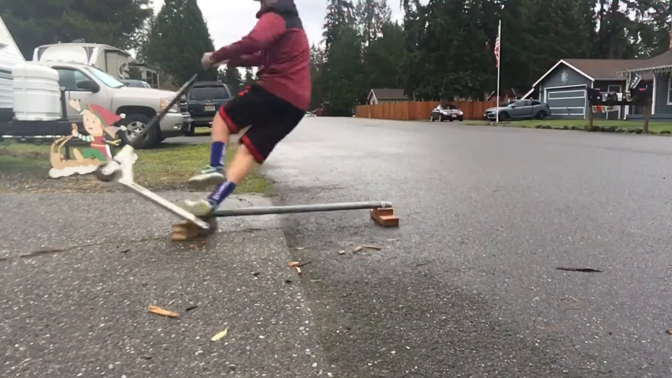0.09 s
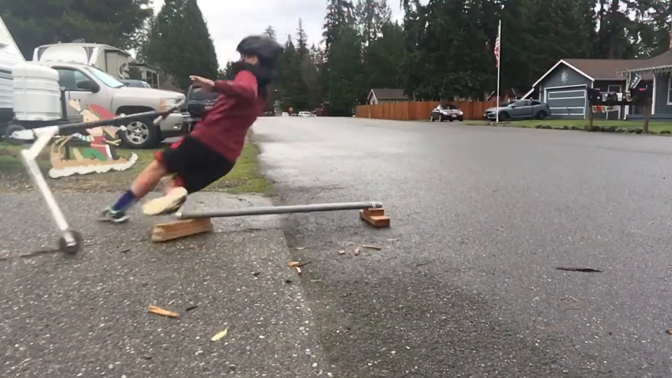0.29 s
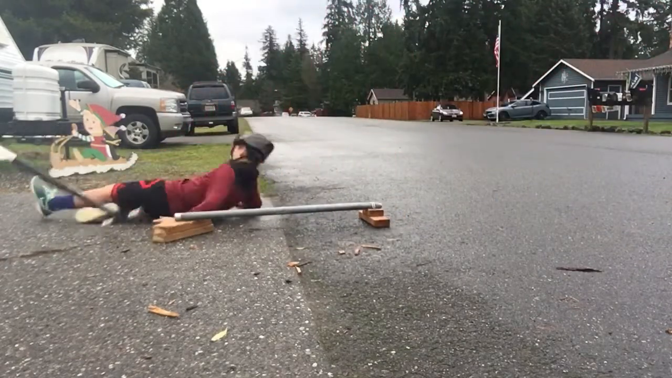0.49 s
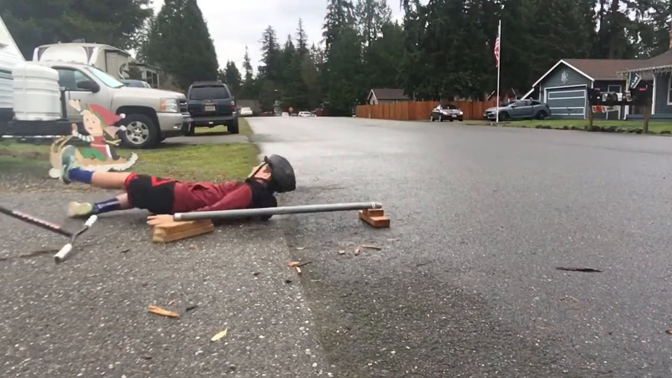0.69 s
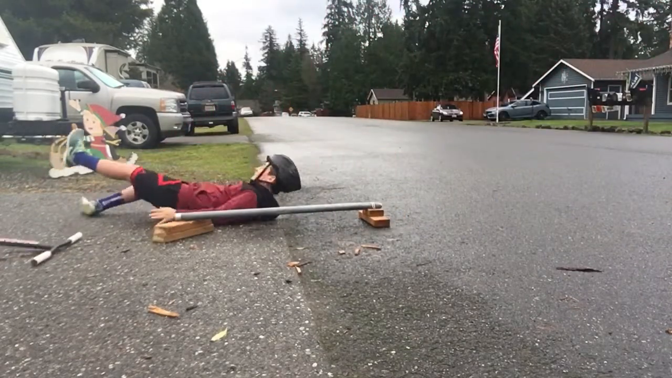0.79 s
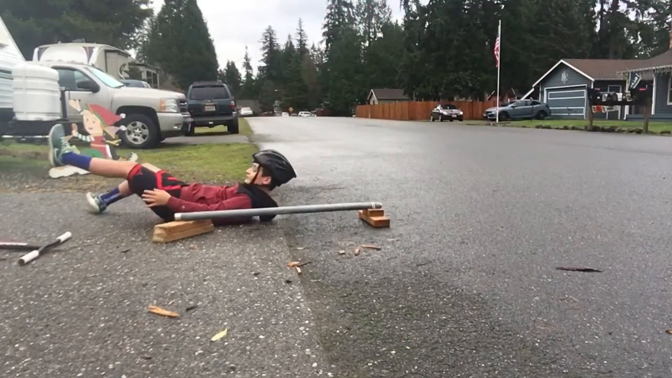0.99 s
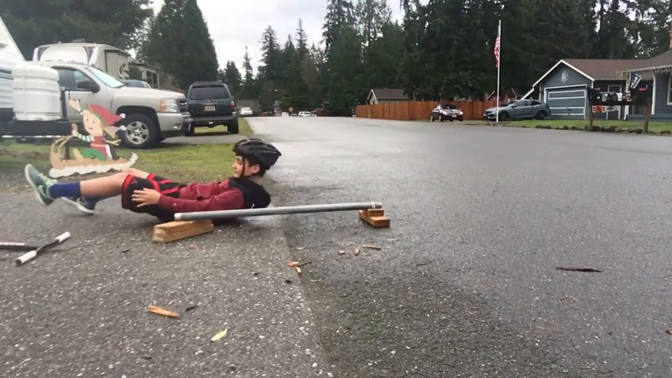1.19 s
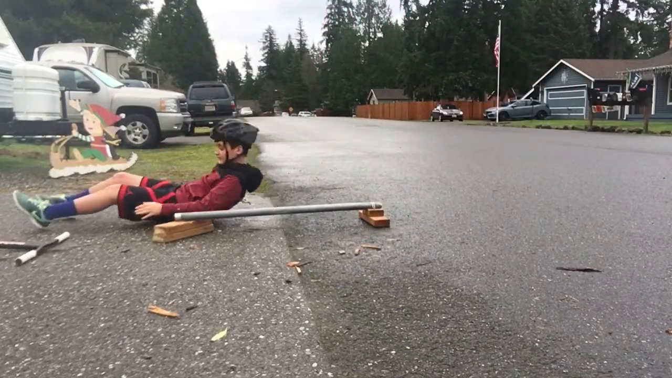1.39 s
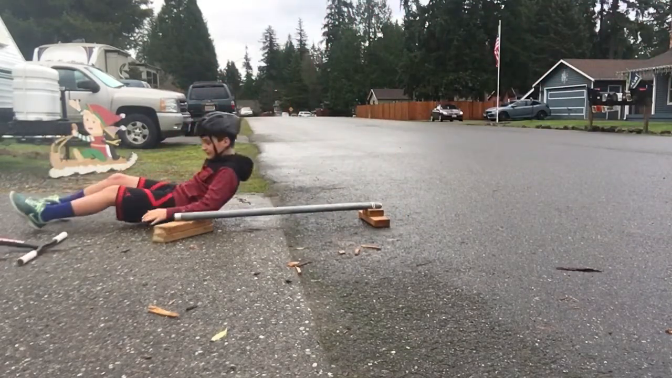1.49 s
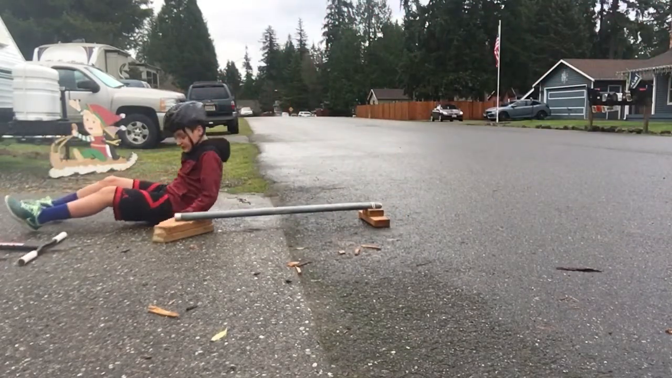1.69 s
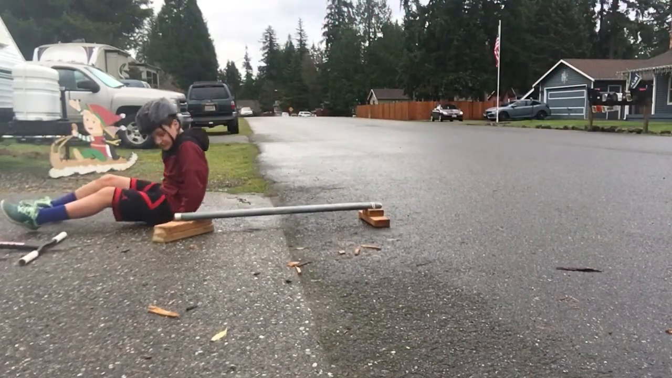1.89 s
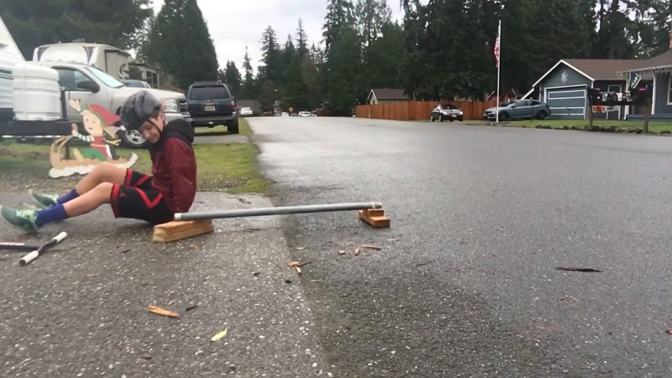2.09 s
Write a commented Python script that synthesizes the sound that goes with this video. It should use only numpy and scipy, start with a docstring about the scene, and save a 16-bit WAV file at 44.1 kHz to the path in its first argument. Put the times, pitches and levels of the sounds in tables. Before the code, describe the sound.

A metal kick scooter crashes and clatters over asphalt after its rider thuds down beside a rail

```python
"""A metal kick scooter tumbles over asphalt: blows of filtered noise crack, rattle and ring modal steel,
its deck knocks hollow and its fittings ping; between bounces it drags, grit ringing the frame.
Its rider slips off a low steel rail: soft noise thumps, snapping grit and a grainy slide, with ringing
rail and handlebar tube. Houses and trees echo all this as decaying noise, over faint outdoor air."""
import sys
import numpy as np
from scipy import signal
from scipy.fft import rfft, irfft, next_fast_len
from scipy.io import wavfile

SR = 44100
rng = np.random.default_rng(int(sys.argv[2]) if len(sys.argv) > 2 else 0)


def dump(signal):
    """Clip the signal to [-1, 1] and save it as 16-bit WAV at the path in sys.argv[1]."""
    limited = np.clip(np.atleast_2d(signal).T, -1, 1)
    pcm = np.round(limited * 32767).astype(np.int16)
    wavfile.write(sys.argv[1], SR, pcm)


N = 92610
AGE = np.arange(32768) / SR  # seconds since an onset

# Band centres [Hz] of thud, middle, treble and top.
TONE_HZ = [200, 1100, 4500, 12000]
# Scooter frame modes. Each row: frequency in Hz, level in dB, T60 in seconds.
FRAME_MODES = [(275, -3.5, 0.066), (472, -5.5, 0.13), (924.5, -1, 0.093), (1090, -13, 0.14),
               (1225, -4.5, 0.16), (1713, -8.5, 0.13), (1564, -12, 0.27), (1945, -8, 0.26),
               (2616, -16.5, 0.2), (2800, -13, 0.14), (4010, -13.5, 0.1), (5520, -21, 0.083)]


def undb(db):
    """Decibels to gain."""
    return 10 ** (np.asarray(db) / 20)


def add(out, start_s, x):
    """Mix x into out from start_s on."""
    i = max(int(start_s * SR), 0)
    out[i:i + len(x)] += x[:N - i]


def colour(x, points, unit=False):
    """Minimum-phase filter through (Hz, dB) points; unit keeps the power of white noise."""
    size = next_fast_len(len(x) + 4096, True) // 2 * 2
    point_hz, point_db = np.array(points, float).T
    bin_hz = np.arange(size // 2 + 1) * SR / size
    gain = undb(np.interp(np.log(bin_hz + 1), np.log(point_hz), point_db))
    if unit:
        gain = gain / np.sqrt(np.mean(gain ** 2))
    # Folding the cepstrum makes the filter causal.
    cepstrum = irfft(np.log(gain))
    cepstrum[1:size // 2] *= 2
    cepstrum[size // 2 + 1:] = 0
    response = np.exp(rfft(cepstrum))
    return irfft(rfft(x, size) * response)[:len(x)]


def walk(rate_hz, size):
    """Random wander: straight lines between normal draws, rate_hz draws a second."""
    position = np.arange(size) * rate_hz / SR
    return np.interp(position, np.arange(size), rng.standard_normal(size))


def grains(spread, size):
    """Tiny contacts as noise of uneven strength, scaled to unit deviation."""
    x = rng.standard_normal(size) * np.exp(spread * walk(1500, size))
    return x / x.std()


def burst(decay_s, points, spread=0.):
    """Coloured noise of a contact, dying exponentially; its energy is set by its length."""
    x = colour(grains(spread, len(AGE)) * np.exp(-AGE / decay_s), points)
    return x * np.sqrt(SR * decay_s / 2) / np.linalg.norm(x)


def ring(modes):
    """Struck modes die away; each beats with a weaker twin, detuned at random at each call."""
    twin_split_hz, twin_db = 28.4, -1
    out = 0
    for hz, db, t60_s in modes:
        drift, split, phase = rng.standard_normal(3)
        t = AGE[:int(min(t60_s * 1.5, .74) * SR)].astype(np.float32)
        # float() keeps the arithmetic in single precision
        omega = float(2 * np.pi * hz * (1 + .002 * drift))
        twin_omega = omega + float(2 * np.pi * twin_split_hz * split)
        twin = undb(twin_db) * np.sin(twin_omega * t + float(np.pi * phase))
        fade = np.exp(-t * float(np.log(1000) / t60_s))
        mode = rng.choice([-1, 1]) * undb(db) * (np.sin(omega * t) + twin) * fade
        out = out + np.pad(mode, (0, len(AGE) - len(t)))
    return out


def air():
    """Faint outdoor air: coloured noise whose level wanders slowly."""
    # Each row: frequency in Hz, level in dB.
    air_colour = [(15, -24), (25, -3), (64, 5), (207, -1.5), (318, 0.5), (515, -5), (621, 3), (1910, -16.5),
                  (2560, -28), (3440, -24), (4870, -30.5), (12400, -42), (15000, -55.5)]
    level_db, wander_db = -50, 0.82
    noise = colour(rng.standard_normal(N), air_colour, True)
    return undb(level_db + wander_db * walk(8, N)) * noise


def rider_slide():
    """Shoes and clothes scrape over the asphalt: grainy coloured noise under varying pressure."""
    # Each row: time in seconds, level in dB before flutter.
    slide = [(0, -39.5), (0.139, -59), (.19, -39), (.235, -33.5), (.255, -36), (.30, -38.5), (.35, -39),
             (.40, -36.5), (.52, -46), (1.0, -86.5)]
    # Each row: frequency in Hz, level in dB.
    scrape = [(60, -8.5), (250, 7.5), (600, -4), (1300, 2.5), (2500, -3.5), (4500, -8), (7000, -10),
              (9000, -23), (15000, -22)]
    grain_spread, flutter_db = .6, 1.8
    pressure_db = np.interp(np.arange(N) / SR, *np.array(slide).T) + flutter_db * walk(70, N)
    return undb(pressure_db) * colour(grains(grain_spread, N), scrape, True)


def rider_thumps():
    """Shoes, hands and body land: short low noise bursts, their slap set by a treble tilt."""
    # Each row: start in seconds, level in dB, decay in seconds, centre in Hz, slap (tilt by 900 Hz) in dB.
    thumps = [(0.001, -28.5, .016, 229, -6), (0.074, -40.5, 0.017, 152, -17.5),
              (0.169, -33.5, 0.013, 184, -39.5), (0.2127, -20, 0.0044, 198, -6),
              (0.2739, -23.5, 0.0087, 247, -4), (0.312, -26, 0.002, 298, 11.5),
              (0.337, -25.5, 0.007, 180, -9), (0.381, -25, 0.0034, 237, -2), (0.447, -29, 0.025, 120, 7.5)]
    # Each row: ratio to the centre, level in dB.
    thump_colour = [(.2, -36.5), (.5, -4), (1.0, 4.5), (1.6, -7.5), (3, -6.5), (7, -13), (15, -21),
                    (60, -49.5)]
    out = np.zeros(N)
    for start_s, db, decay_s, centre_hz, slap_db in thumps:
        push = burst(decay_s, [(centre_hz * ratio, gain_db) for ratio, gain_db in thump_colour])
        add(out, start_s, undb(db) * colour(push, [(300, 1.1), (900, 5.5 + slap_db)]))
    return out


def handlebar():
    """The handlebar tube clinks lightly: ringing modes with a short noisy rasp."""
    # Each row: start in seconds, middle, treble and top gain in dB, rasp in dB, rasp decay in seconds.
    clinks = [(0.001, -42, -42.5, -43, 4, .028), (0.1515, -35, -41, -51, 10, .008),
              (0.187, -44, -45, -42, 3, .022)]
    # Each row: frequency in Hz, level in dB, T60 in seconds.
    tube_modes = [(1322, -2, .22), (1620, -2, .12), (2040, -2, .13), (2290, -4, .18), (2570, -3.5, .24),
                  (2966, -5, .26), (5905, -8, .17), (7230, -3.5, .21), (7450, -9, .16), (9017, -11, .14),
                  (11090, -13, .14), (13600, -8, .16), (14220, -9, .14)]
    # Each row: frequency in Hz, level in dB.
    rasp_colour = [(300, -10.5), (1900, 0), (4000, -7.5), (7000, -6), (9500, -14), (14000, -14)]
    out = np.zeros(N)
    for start_s, middle_db, treble_db, top_db, rasp_db, decay_s in clinks:
        tone = list(zip(TONE_HZ[1:], (middle_db, treble_db, top_db)))
        clink = ring(tube_modes) + undb(rasp_db) * burst(decay_s, rasp_colour)
        add(out, start_s, colour(clink, tone))
    return out


def street(x):
    """Scattered echo: bands of noise swell, peak again with the house fronts, and fade at their own T60."""
    # Each row: band centre in Hz, level in dB, T60 in seconds.
    echo_bands = [(120, -72, .8), (280, -19, 1), (620, -12.5, 0.94), (1240, -17.5, 0.34), (1900, -17, 0.64),
                  (3900, -14.5, 0.41), (7500, -35, 0.53), (12860, -22, .4)]
    rise_s, house_s, house_spread_s, house_gain = 0.011, 0.085, 0.026, 0.37
    bin_hz = np.arange(len(AGE) // 2 + 1) * SR / len(AGE)
    log_centres = np.log([row[0] for row in echo_bands])
    noise = rfft(rng.standard_normal(len(AGE)))
    houses = house_gain * np.exp(-((AGE - house_s) / house_spread_s) ** 2)
    swell = 1 - np.exp(-AGE / rise_s) + houses
    tail = 0
    for share, (_, db, t60_s) in zip(np.eye(len(echo_bands)), echo_bands):
        fade = swell * np.exp(-np.log(1000) * AGE / t60_s)
        band = irfft(noise * np.interp(np.log(bin_hz + 1), log_centres, share))
        tail = tail + undb(db) * band * fade / np.linalg.norm(fade)
    return signal.fftconvolve(x, tail)[:N]


def deck():
    """Deck and wheels knock hollow: each swells and dies within a few cycles, leaving a faint ring."""
    # Each row: start in seconds, level in dB, centre in Hz.
    deck_knocks = [(0.089, -24, 554), (0.312, -5, 1253), (0.4255, -2.5, 582), (0.4375, -2, 845),
                   (0.4432, -7, 1780), (0.4504, -4, 1794), (0.458, -1, 1773), (0.7149, -4, 1190),
                   (0.7232, 6, 1390), (0.7255, 1, 1138), (0.7257, -1.5, 275.2), (0.827, -5.5, 1140),
                   (1.2911, 3, 1058), (1.3036, -9, 1120), (1.3169, 4.5, 1090), (1.3215, -6.5, 518),
                   (1.325, -11, 279), (1.5196, 8.5, 1071), (1.5251, -16, 289), (1.5402, 1, 1107),
                   (1.438, -20, 522), (1.640, -16.5, 602), (1.7912, -4, 1051), (1.7913, -15.5, 314.5),
                   (1.7924, -3.5, 1730), (1.854, -11.5, 1135)]
    # Each row: ratio to the centre, level in dB, T60 in cycles of the centre.
    deck_modes = [(0.884, -26, 102), (0.998, -0.5, 11.4), (1.172, -31, 100)]
    rise_cycles = 1.12
    out = np.zeros(N)
    for start_s, db, centre_hz in deck_knocks:
        cycles = centre_hz * AGE
        knock = 0
        for ratio, gain_db, t60_cycles in deck_modes:
            fade = np.exp(-np.log(1000) * cycles / t60_cycles)
            knock = knock + undb(gain_db) * np.sin(2 * np.pi * ratio * cycles) * fade
        rise = (1 - np.exp(-cycles / rise_cycles)) ** 2
        add(out, start_s, undb(db) * knock * rise)
    return out


def grit_snaps():
    """Grit snaps under rider and scooter: brief noise bursts around a centre frequency."""
    # Each row: start in seconds, level in dB, decay in seconds, centre in Hz.
    snaps = [(0.129, -41, 0.0044, 4140), (0.2233, -20.5, 0.0047, 3250), (0.230, -31.5, 0.012, 3740),
             (0.2757, -27.5, 0.0018, 3400), (0.291, -33.5, 0.0015, 7800), (0.3119, -22, 0.0012, 5940),
             (0.3127, -14.5, .001, 2800), (0.343, -37.5, 0.0033, 4260), (0.387, -15.5, 0.0014, 3150),
             (0.4411, -21.5, 0.0036, 6000), (1.5198, -20.5, .004, 2530)]
    # Each row: ratio to the centre, level in dB.
    snap_colour = [(.03, -19.5), (.3, -4.5), (.65, -3), (1.0, -1), (1.3, -4.5), (1.7, -13), (2.6, -26.5),
                   (5, -49)]
    out = np.zeros(N)
    for start_s, db, decay_s, centre_hz in snaps:
        points = [(centre_hz * ratio, gain_db) for ratio, gain_db in snap_colour]
        add(out, start_s, undb(db) * burst(decay_s, points))
    return out


def scooter():
    """Each blow is a crack, a dying rattle of loose parts and the frame's ring; the bass builds more slowly."""
    # Each row: start in seconds, thud, middle, treble and top gain in dB, rattle in dB,
    # rattle decay in seconds, frame ring in dB (halved in amplitude below).
    blows = [(0.188, -24, -26.5, -40, -22, -5, 0.018, -26), (0.4206, -28.5, -24, -15.5, -23, 5.5, 0.016, 1),
             (0.4418, -12, -15, -6.5, -12, -1.5, 0.019, -7),
             (0.671, -25, -29.5, -23, -21, 3.5, 0.023, -0.5),
             (0.7222, -16.5, -8.5, -5.5, -7, -1, 0.01, -8.5),
             (0.7334, -5.5, -20.5, -9.5, -12.5, -4, 0.019, -1.5),
             (1.2926, -18.5, -22.5, -18.5, -23, -2.5, 0.033, 0.5),
             (1.3175, -16, -11, -11, -9, -3, 0.017, -3), (1.402, -44, -28.5, -25, -27.5, -5, 0.029, -1.5),
             (1.5185, -19, -19, -21, -26.5, 3.5, 0.014, 2.5), (1.541, -39, -20, -22.5, -30.5, 1, 0.025, 1),
             (1.723, -46, -33.5, -38, -47, 5.5, 0.025, 4.5), (1.7904, -29, -23.5, -15, -20.5, 0, 0.014, 2),
             (1.835, -38, -33.5, -33.5, -57, 4.5, 0.013, 5),
             (1.855, -27.5, -27, -27.5, -39, 1, 0.017, -3.5), (1.879, -50, -27.5, -33, -47, 3.5, 0.013, 1)]
    # Each row: frequency in Hz, level in dB.
    clack_colour = [(30, -19), (70, 0), (150, -0.5), (250, 7.5), (390, -2), (700, 0.5), (1000, 2.5),
                    (1750, 3.5), (2200, -6), (3000, -8), (4100, -12.5), (4900, -19), (6600, -16),
                    (8500, -24.5), (10500, -35.5), (13000, -31), (16000, -40)]
    crack_s, bass_hz, bass_lag_s, rattle_spread = 0.0056, 328, 0.0024, .5
    bass_filter = signal.butter(2, bass_hz, fs=SR, output="sos")
    out = np.zeros(N)
    for start_s, thud_db, middle_db, treble_db, top_db, rattle_db, decay_s, ring_db in blows:
        crack = burst(crack_s, clack_colour)
        rattle = undb(rattle_db) * burst(decay_s, clack_colour, rattle_spread)
        rattle = rattle * (1 - np.exp(-AGE / crack_s))  # rises as the crack dies
        frame = undb(ring_db) * .5 * ring(FRAME_MODES)
        tone = list(zip(TONE_HZ, (thud_db, middle_db, treble_db, top_db)))
        hit = colour(crack + rattle + frame, tone)
        bass = signal.sosfilt(bass_filter, hit)
        add(out, start_s, hit - bass * np.exp(-AGE / bass_lag_s))
    return out


def skid():
    """The scooter drags over the asphalt between bounces: grit ticks against it and keeps the frame ringing."""
    # Each row: time in seconds, level in dB.
    drag = [(.44, -80), (.5, -37), (.62, -38), (.72, -39), (.83, -34.5), (.9, -36), (1.0, -52),
            (1.28, -86.5), (1.38, -39), (1.5, -39), (1.68, -60)]
    # Each row: frequency in Hz, level in dB.
    skid_colour = [(100, -7), (700, 3), (1100, 6.5), (1900, 1.5), (2400, -8), (7000, -24), (15000, -47.5)]
    ring_db, grain_spread = -4.5, .6
    ticks = grains(grain_spread, N) * undb(np.interp(np.arange(N) / SR, *np.array(drag).T))
    frame = ring(FRAME_MODES)
    ringing = signal.fftconvolve(ticks, frame / np.linalg.norm(frame))[:N]
    return colour(ticks, skid_colour, True) + undb(ring_db) * ringing


def rail():
    """The steel rail hums in its modes as the rider comes down on it."""
    # Each row: start in seconds, level in dB.
    rail_hits = [(0.4415, -25)]
    # Each row: frequency in Hz, level in dB, T60 in seconds.
    rail_modes = [(329, 3.5, .32), (551, -6, .32), (678, -6, .42), (1206, -6, .36), (1513, -3, .32),
                  (1841, -12, .4), (2900, -8, .16), (3984, -11, .2), (4500, -11, .14), (6551, -12, .2),
                  (6790, -10, .19)]
    out = np.zeros(N)
    for start_s, db in rail_hits:
        add(out, start_s, undb(db) * ring(rail_modes))
    return out


def fittings():
    """Small fittings ping in high modes on sharp blows."""
    # Each row: start in seconds, level in dB.
    pings = [(0.4425, -28), (0.7217, -30), (1.319, -30), (1.801, -34.5)]
    # Each row: frequency in Hz, level in dB, T60 in seconds.
    fitting_modes = [(2440, -8, .26), (2735, -3, .1), (2960, -6, .1), (3215, -9, .1), (3460, 3, .07),
                     (3950, -5, .08), (4660, -13, .11), (5280, -11, .1), (6075, -4, .06), (6690, -6, .09),
                     (6950, -8, .07)]
    out = np.zeros(N)
    for start_s, db in pings:
        add(out, start_s, undb(db) * ring(fitting_modes))
    return out


def scene():
    """The fall and its echo over faint outdoor air."""
    rider = rider_slide() + rider_thumps() + grit_snaps()
    tumble = scooter() + deck() + fittings() + skid() + handlebar()
    near = rider + tumble + rail()
    return (near + street(near) + air())[None]


def record(dry):
    """The phone thins the deepest bass, clips at full scale and cuts the top."""
    bass_cut_hz, top_hz = 38, 15900
    thin = signal.sosfilt(signal.butter(2, bass_cut_hz, "high", fs=SR, output="sos"), dry)
    clipped = np.clip(thin, -1, 1)
    return signal.sosfilt(signal.ellip(8, .2, 70, top_hz, fs=SR, output="sos"), clipped)


dry = scene()
out = record(dry)
dump(out)
```